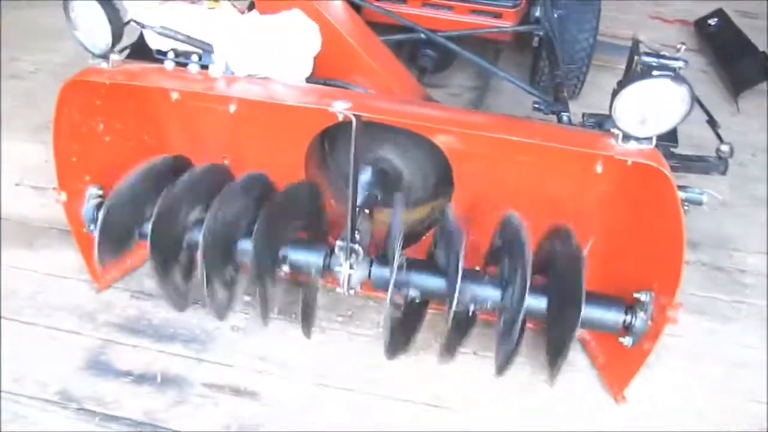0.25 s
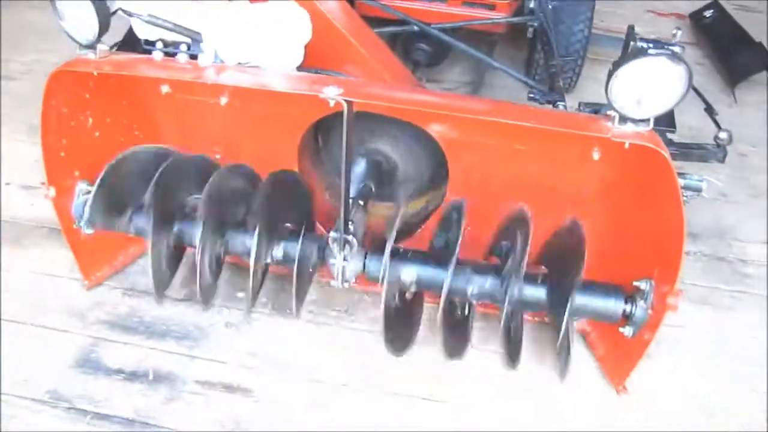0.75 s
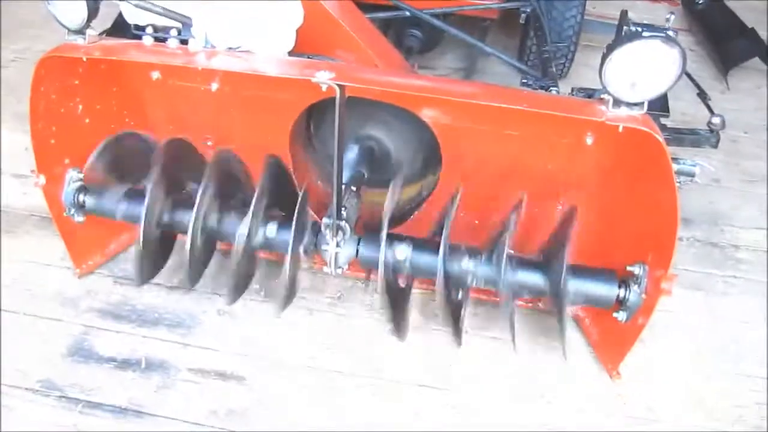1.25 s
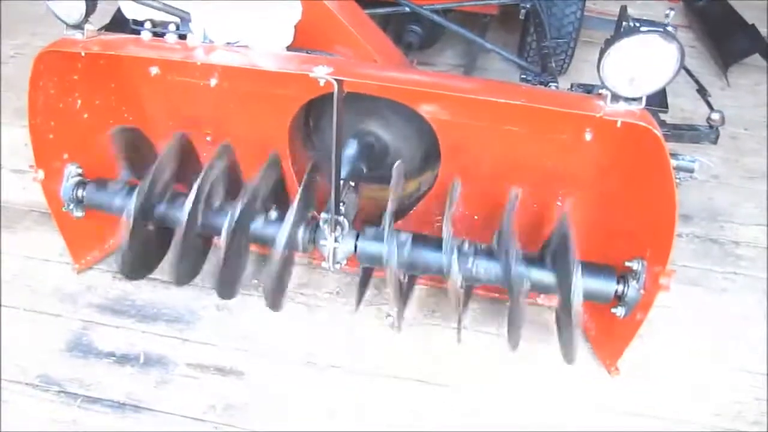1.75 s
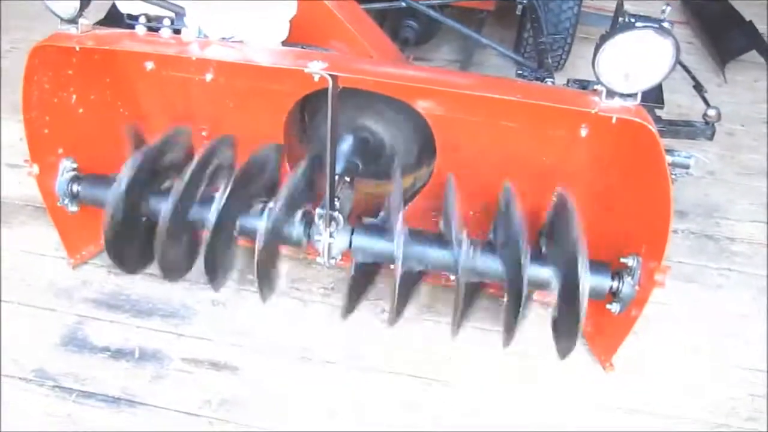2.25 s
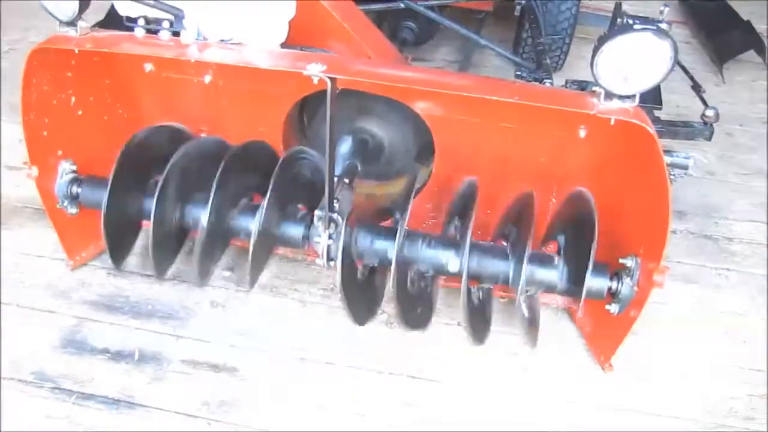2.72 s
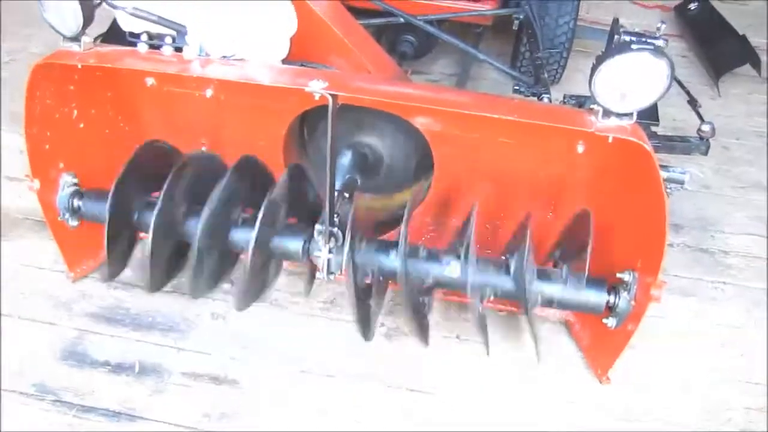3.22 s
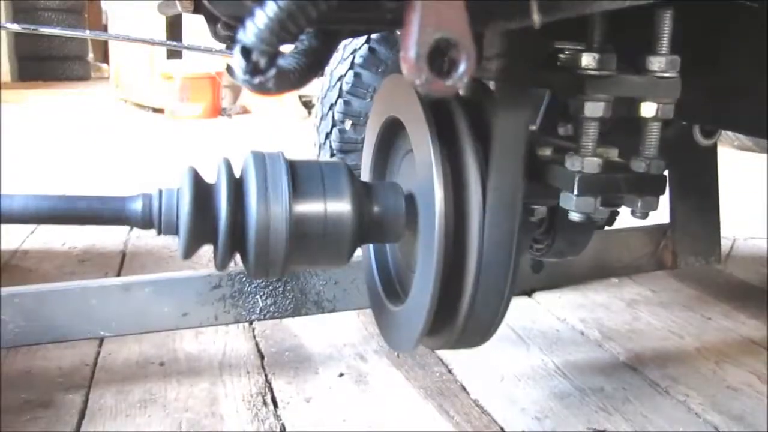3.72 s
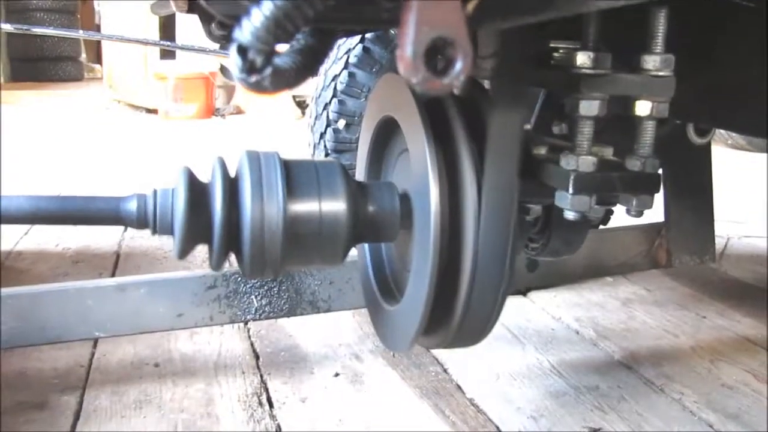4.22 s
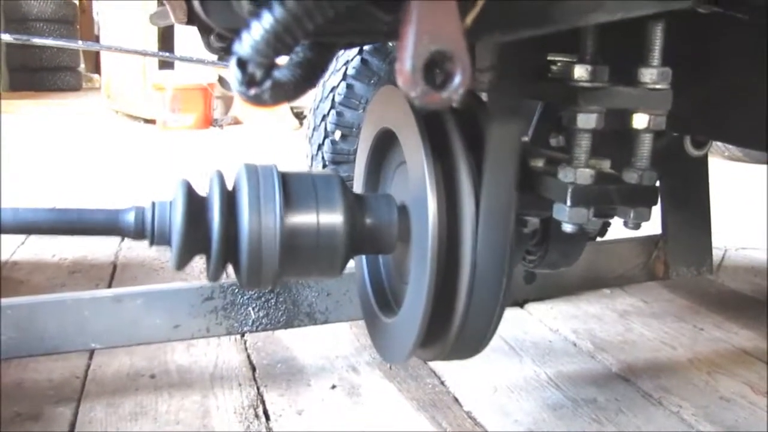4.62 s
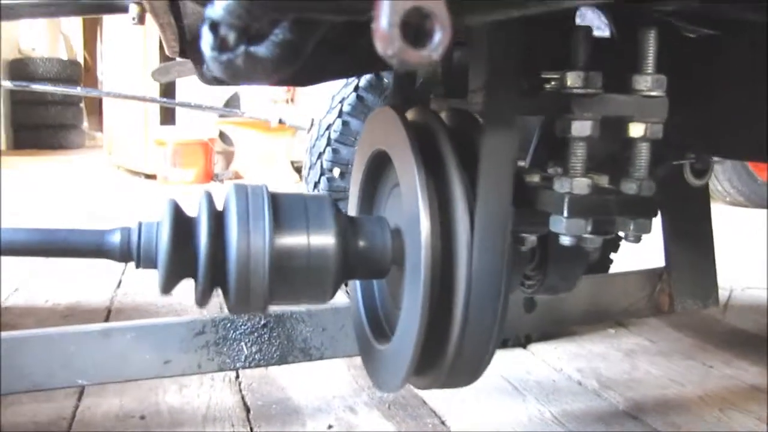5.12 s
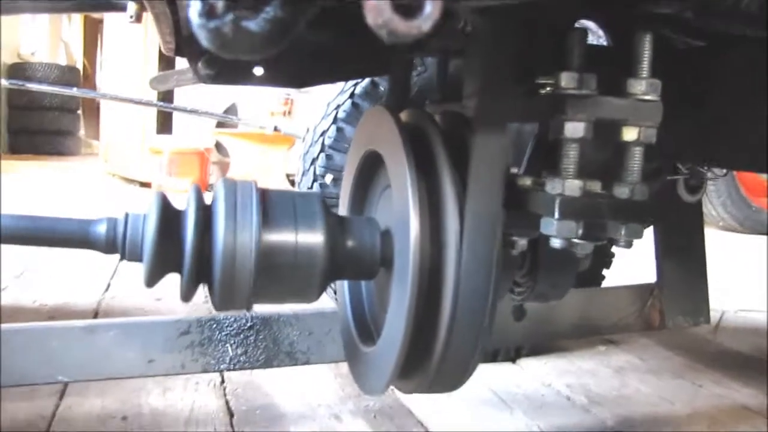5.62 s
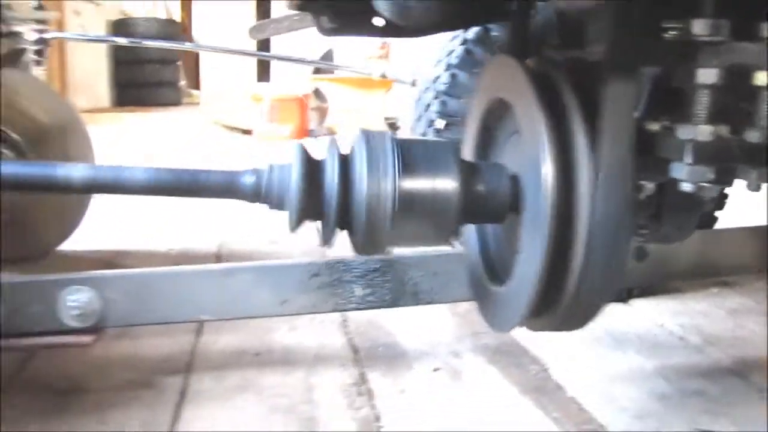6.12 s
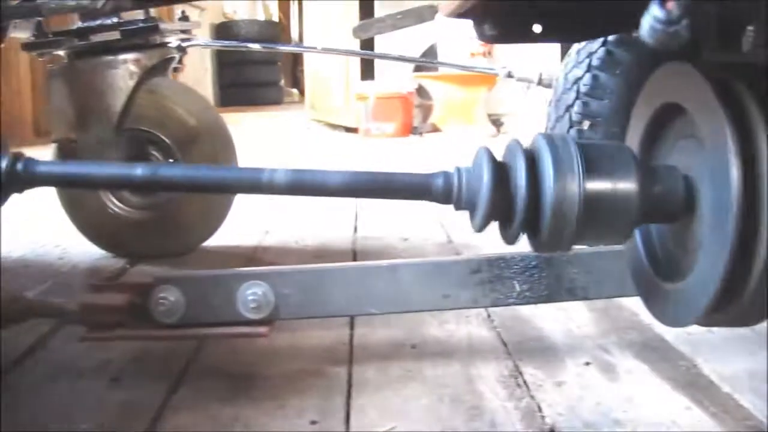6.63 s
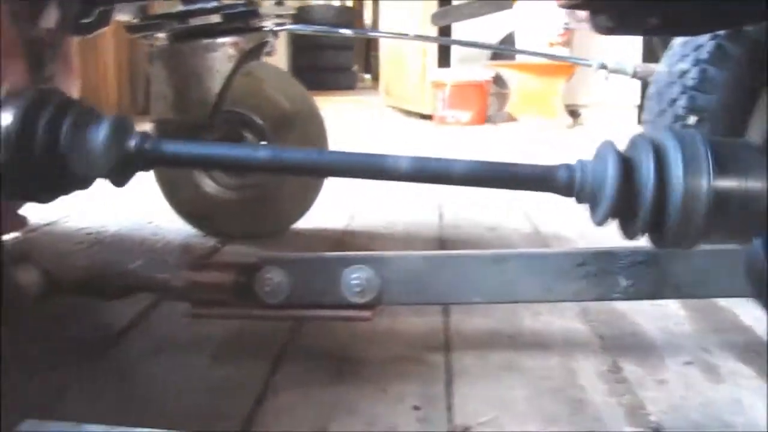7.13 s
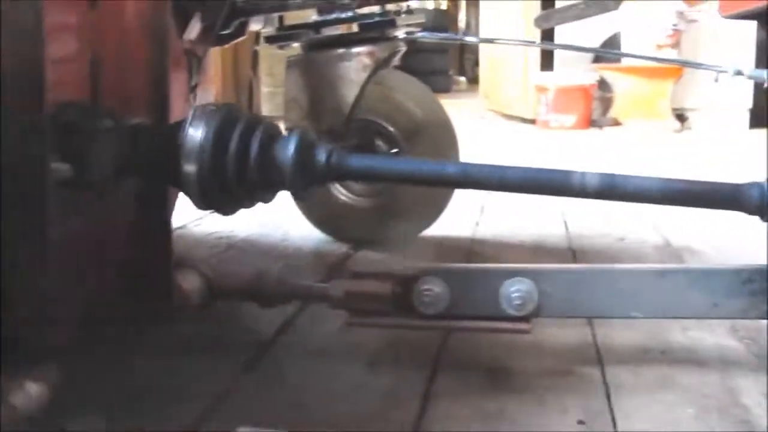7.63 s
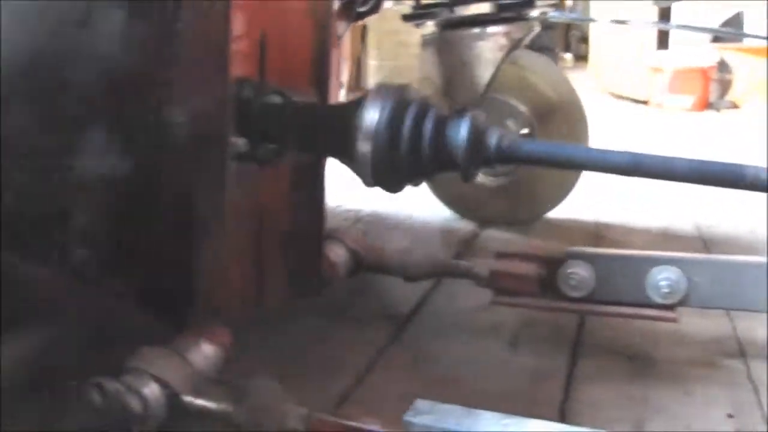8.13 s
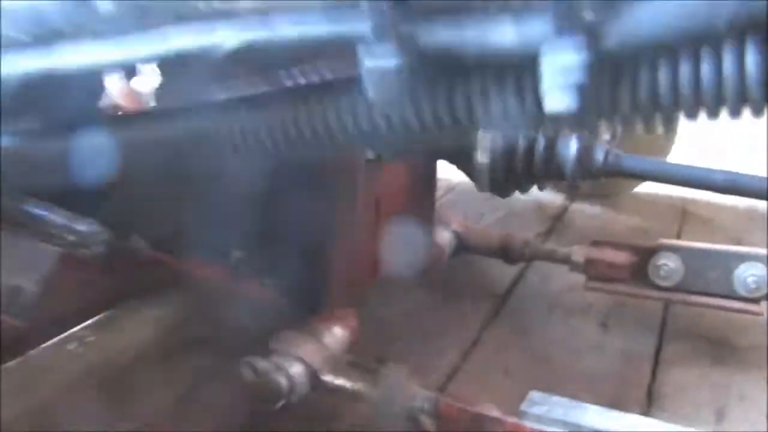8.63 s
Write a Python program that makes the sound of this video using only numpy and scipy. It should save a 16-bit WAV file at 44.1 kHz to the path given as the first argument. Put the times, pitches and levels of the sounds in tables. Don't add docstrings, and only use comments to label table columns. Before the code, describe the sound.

From 0 s a small one-cylinder engine runs steadily, already at full level: a rough low drone around 140 hertz with a slower-beating impeller hum, a wide airy roar, loose steel buzz, rapid valve ticking and hiss. In front of the microphone an empty auger turns nearly four times a second, each turn giving hard metallic knocks and bright gritty scrapes, slightly irregular. Everything fades steadily until about 3.15 s, then there is a silence of under 0.2 s. From 3.3 s the machine fades in slowly, close to the pulley, with no auger clatter: a smoother drone, less roar, faint pump whine near two kilohertz. From about 6.2 s the position moves along the shaft; rattle and roar grow, the whine stands out strongly around 7.4 to 7.9 s, then drops abruptly near 8 s. The drone continues, loudest at the end, near 8.9 s, without stopping.

```python
import sys
import numpy as np
from scipy import signal
from scipy.fft import rfft, irfft, next_fast_len
from scipy.io import wavfile
from scipy.ndimage import map_coordinates

SR = 44100
rng = np.random.default_rng(int(sys.argv[2]) if len(sys.argv) > 2 else 0)


def field_ratio(decibels):
    return 10 ** (np.asarray(decibels, dtype=float) / 20)


def dump(signal):
    limited = np.clip(np.atleast_2d(signal).T, -1, 1)
    pcm = np.round(limited * 32767).astype(np.int16)
    wavfile.write(sys.argv[1], SR, pcm)


N = 390726
GAP_START_S, GAP_END_S = 3.152, 3.3185
BELT_RATIO = .8188
AUGER_TURN_S = .2629
TICK_SAMPLES = 500
THIN = 8

# [t/s, place: 0 front, 1 pulley, 2 behind the housing]
PATH = [
    (0, 0),
    (3.2, 0),
    (3.3, 1),
    (6.2, 1),
    (7.2, 1.95),
    (8.86, 2.177),
]
# [t/s, f/Hz]
CRANK_SPEED = [(0.2, 46.48), (0.6, 46.43), (1.2, 46.55), (2.2, 46.45), (3.0, 46.62), (3.45, 46.61),
               (4.35, 46.68), (4.95, 46.42), (5.3, 46.56), (5.7, 46.9), (6.45, 46.48), (6.8, 46.42),
               (7.35, 46.8), (7.7, 46.96), (8.0, 46.88), (8.55, 46.31)]
# [multiple of crank turns, level/dB front, level/dB pulley, level/dB behind]
EXHAUST_ORDERS = [(1, -21, -19, -21), (2, -17, -16, -17), (3, 0, 0, 0), (4, -7, -8, -7), (5, -16, -13, -11),
                  (6, -14, -16, -9), (7, -25, -18, -20), (8, -19, -13, -17), (9, -19, -18, -20),
                  (10, -23, -18, -23), (11, -22, -26, -24), (12, -26, -28, -29)]
# [f/Hz, width f/Hz, level/dB]
SILENCER_MODES = [(135, 60, 0), (300, 90, -8), (480, 140, 0)]
# [f/Hz, density level/dB per Hz]
RUMBLE_SPECTRUM = [(25, -24), (42, -10), (60, -9), (100, -5), (160, -1.5), (215, -5.5), (320, -7.5),
                   (450, -16.5), (600, -40.5)]
# [multiple of shaft turns, level/dB front, level/dB pulley, level/dB behind]
SHAFT_ORDERS = [(1, -12, -17, -19), (2, -18, -17, -17), (3, 0, 0, 0), (5, -5, -16, -16), (6, -1, -15, -14),
                (9, -8, -14, -19), (12, -21, -24, -26), (15, -16, -32, -30)]
# [multiple of crank turns, level/dB front, level/dB pulley, level/dB behind, share of the swell]
PUMP_ORDERS = [(20, -21, -24.5, -14, .2), (38, -29, -16.5, -22, .5), (40, -30, -23, -30, .4),
               (42, -13.5, -12.5, -12.5, 1), (46, -22, -18.5, -24, 1)]
# [t/s, level/dB]
PUMP_SWELL = [
    (3.2, -1),
    (4.35, 2.5),
    (4.95, -3),
    (5.5, -2.5),
    (5.9, 1),
    (6.7, -5.5),
    (7.4, 9.5),
    (7.92, 5.5),
    (8.08, -9.5),
]
# [f/Hz, density level/dB per Hz]
ROAR_SPECTRA = [
    [(180, -26), (300, -6.5), (459, -7.5), (607, -3), (833, -9.5), (912, -8.5), (998, -9), (1980, -6),
     (2270, -8), (2600, -18.5), (3380, -41), (5720, -120)],
    [(180, -42), (300, -7.5), (356, -5), (467, -9.5), (511, -8.5), (727, -8), (937, -11), (1210, -9.5),
     (1910, -11.5), (2600, -25.5), (3380, -43), (5720, -120)],
    [(180, -33), (300, -8.5), (322, -7), (404, -15), (591, -4.5), (768, -10.5), (928, -9), (1160, -10),
     (1960, -9.5), (2600, -25.5), (3380, -51), (5720, -120)],
]
# [f/Hz, density level/dB per Hz]
RATTLE_SPECTRA = [
    [(1350, -37), (2300, -6), (2540, 1.5), (3190, -0.5), (5200, -10), (6760, -38.5), (11400, -120)],
    [(1350, -23), (2300, 1), (3650, -1), (4300, -2), (5200, -11), (6760, -34), (11400, -120)],
    [(1350, -42), (2300, 0), (2570, 3), (2770, -1), (3350, -0.5), (4760, -6), (5200, -6), (6760, -12),
     (11400, -120)],
]
# [f/Hz, density level/dB per Hz]
HISS_SPECTRA = [
    [(2820, -37), (4800, -5.5), (5270, -6), (6140, -1.5), (7970, -5.5), (8670, -8), (9520, -9.5),
     (12500, -16.5), (14400, -28), (15600, -31)],
    [(2820, -27), (4800, -0.5), (5320, -5), (5790, 1.5), (6020, 0.5), (8170, -6), (10500, -5.5),
     (11600, -11.5), (13300, -14), (14500, -24), (15600, -34)],
    [(2820, -31), (4800, 0.5), (5320, -10.5), (6170, -0.5), (9470, -4.5), (10500, -6.5), (14500, -20.5),
     (15600, -47)],
]
# [f/Hz, width f/Hz, level/dB]
BRACKET_MODES = [(985, 30, -3), (1297, 50, -1), (1600, 50, -5), (1860, 30, 1), (2025, 70, -1),
                 (2630, 60, -5)]
# [f/Hz, level/dB front, level/dB beside the engine]
VALVE_MODES = [(3090, -7, -3.5), (4310, -9, -3.5), (5890, 0, 0), (6340, -5, -3.5), (6800, 3.5, -11),
               (7110, -6, -3.5), (7800, -2, -9), (8700, -9.5, -5.5), (9580, -1.5, -8), (10400, -13, -6),
               (11210, -10, -9), (12200, -14, -9)]
# [first t/s, knock level/dB, scrape level/dB over the exhaust, scatter level/dB]
AUGER_CONTACTS = [
    (.0705, 2, -4, 2),
    (.1225, 9.5, -14, .5),
    (.16, -8, -9, 3),
    (.2435, -2, 1.5, 1),
    (2.9614, 4, 3, 0),
]
# [f/Hz, width f/Hz, level/dB]
HOUSING_MODES = [(2700, 720, 2), (3260, 1120, -2.5), (4330, 1400, -7), (1500, 620, 2)]
# [f/Hz, width f/Hz, level/dB]
BLADE_MODES = [(5975, 960, 4), (6540, 550, -5.5), (7370, 800, -3)]
# [place, roar level/dB, rattle level/dB, hiss level/dB, impeller level/dB]
LAYER_LEVELS = [(0, -4.5, -9.3, -14.5, -8.5), (1, -10.3, -15.2, -17.3, -4.5),
                (1.3, -13.5, -18, -19.3, -4.5), (1.95, -11.5, -17, -18.7, -3.5),
                (2.02, -9.2, -12.4, -19.5, -3)]
# [f/Hz, correlation]
CORRELATION = [(25, 1), (100, 0.92), (300, .9), (700, 0.86), (1400, 0.86), (3000, .35), (7000, 0.41),
               (15000, .15)]
# [f/Hz, level/dB]
BALANCE = [(60, 3), (150, 5), (380, 0), (950, 3.5), (2380, 0), (5980, 2), (15000, -1)]
# [left lag in samples, left-right level/dB]
PORT_SKEW = [(-.3, -1.2), (1.5, 0.6), (3, -0.8)]
# [silent at t/s, length t/s, full level/dB, curve power]
FADE_OUT_CURVE = (3.28, 3.28, -42.7, .85)
FADE_IN_CURVE = (3.32, 3.3, -33, .87)


def unit(x):
    return x / np.sqrt(np.mean(x ** 2) + 1e-20)


def along(points, hz):
    f, value = np.transpose(points)
    return np.interp(np.log(hz + 1), np.log(f + 1), value)


def over_time(points):
    return np.interp(np.arange(N) / SR, *np.transpose(points))


def place():
    return over_time(PATH)


def by_place(layers):
    at = place()
    return sum(np.sqrt(np.clip(1 - abs(at - k), 0, 1)) * x for k, x in enumerate(layers))


def layer_levels_db():
    at, *layers = np.transpose(LAYER_LEVELS)
    return [np.interp(place(), at, db) for db in layers]


def wobble(rate_hz, size=1):
    step = np.arange(0, N + 64, 32)
    knots = rng.standard_normal(int(N * rate_hz / SR) + 4)
    curve = map_coordinates(knots, [step * rate_hz / SR])
    return np.interp(np.arange(0, N, size), step, curve)


def turns(hz):
    return 2 * np.pi * np.cumsum(hz) / SR


def filtered(x, response):
    m = next_fast_len(N + 8192)
    return irfft(rfft(x, m) * response(np.fft.rfftfreq(m, 1 / SR)), m)[..., :N]


def modes(table):
    return lambda f: sum(field_ratio(db) * 1j * f * w / (c * c - f * f + 1j * f * w) for c, w, db in table)


def rush(spectra, gate):
    m = next_fast_len(N + 8192)
    hz = np.fft.rfftfreq(m, 1 / SR)
    angle = np.arccos(np.clip(along(CORRELATION, hz), -1, 1)) / 2
    same, other = rfft(gate * rng.standard_normal((2, N)), m) * [np.cos(angle), np.sin(angle)]
    lean = field_ratio(along(BALANCE, hz) / 2)
    left, right = (same + other) * lean, (same - other) / lean
    heard = []
    for spectrum, (lag, db) in zip(spectra, PORT_SKEW):
        colour = field_ratio(along(spectrum, hz))
        skew = field_ratio(db / 2) * np.exp(-1j * np.pi * hz * lag / SR)
        ports = np.array([left * colour * skew, right * colour / skew])
        heard.append(unit(irfft(ports, m)[:, :N]))
    return by_place(heard)


def stack(angle, orders, flutter_db):
    mean_hz = angle[-1] / (2 * np.pi) * SR / N
    coarse, at = angle[::THIN], place()[::THIN]
    tones = 0
    for k, *db in orders:
        level_db = np.interp(at, np.arange(len(db)), db) + flutter_db * wobble(7, size=THIN)
        lag = np.angle(modes(SILENCER_MODES)(k * mean_hz)) - 1
        sway = .025 * k * wobble(9, size=THIN)
        tones = tones + np.sqrt(2) * field_ratio(level_db) * np.cos(k * coarse + lag + sway)
    return signal.resample_poly(tones, THIN, 1)[:N]


def exhaust(crank):
    rumble = field_ratio(-12.5) * rush([RUMBLE_SPECTRUM] * 3, field_ratio(1.5 * wobble(13)))
    return field_ratio(-1.54) * stack(crank, EXHAUST_ORDERS, flutter_db=0.5) + rumble


def impeller(shaft):
    impeller_db = layer_levels_db()[-1]
    return field_ratio(impeller_db - 1.4) * stack(shaft, SHAFT_ORDERS, flutter_db=0.67)


def pump(crank):
    swell_db = over_time(PUMP_SWELL)
    at = place()
    skew = np.array([[.5], [-.5]])
    whine = 0
    for k, *db, share in PUMP_ORDERS:
        level_db = np.interp(at, [0, 1, 2], db) + share * swell_db + 0.44 * wobble(25)
        line = field_ratio(-2.5 * skew) * np.cos(k * crank + .03 * k * skew + 0.27 * wobble(20))
        whine = whine + field_ratio(level_db) * line
    return whine


def closing(crank, second_db):
    def seat(late):
        return np.exp(-np.mod(crank - late, 2 * np.pi) / .5) * field_ratio(5.3 * wobble(65))
    return seat(0) + field_ratio(second_db) * seat(2.5)


def valves(crank):
    hz, front_db, side_db = np.transpose(VALVE_MODES)
    t, out = np.arange(TICK_SAMPLES) / SR, np.zeros((2, N + TICK_SAMPLES))
    shape = field_ratio(-60 * t / 0.021) * (1 - np.exp(-t / .0012))
    drift = np.array([wobble(1.43) for _ in hz])
    # lag in radians, level/dB in front, level/dB beside the engine
    for late, front_cut_db, side_cut_db in [(0, 0.5, 0), (2.3, -10, -3.5)]:
        for i in np.flatnonzero(np.diff(np.floor((crank - late) / (2 * np.pi)))):
            in_front = i < GAP_START_S * SR
            level_db = front_db + front_cut_db if in_front else side_db + side_cut_db
            size, detune, *phase = rng.standard_normal((4, len(hz), 1))
            ring_hz = hz[:, None] * (1 + .01 * detune)
            ring = np.sin(2 * np.pi * ring_hz * t + 1.86 * np.array(phase))
            gain = field_ratio((level_db + 1.2 * drift[:, i])[:, None] + 4 * size)
            out[:, i:i + TICK_SAMPLES] += (gain * ring).sum(axis=1) * shape
    return unit(out[:, :N])


def works(crank, shaft):
    roar_db, rattle_db, hiss_db = layer_levels_db()[:-1]
    beat = np.cos(crank - 1) + .5 * np.cos(shaft)
    shared = .6 * wobble(10) + 0.87 * wobble(40)
    seats = by_place([closing(crank, second_db=db) for db in (-15, -3, 0)])
    roar = rush(ROAR_SPECTRA, field_ratio(0.6 * beat + 0.92 * shared + 0.41 * np.cos(4 * crank)))
    rattle = rush(RATTLE_SPECTRA, field_ratio(1.2 * beat + 0.44 * shared + 0.86 * wobble(25)) + .15 * seats)
    hiss = rush(HISS_SPECTRA, field_ratio(1.2 * beat + 0.47 * shared + 2.3 * wobble(60)) + 0.85 * seats)
    shaking = rng.standard_normal((2, N)) * field_ratio(2.5 * wobble(5))
    buzz = unit(filtered(shaking, lambda f: modes(BRACKET_MODES)(f) ** 2))
    low = field_ratio(roar_db + 0.61) * (roar + field_ratio(-8.5) * buzz)
    high = field_ratio(0.5) * hiss + field_ratio(-4) * valves(crank)
    return low + field_ratio(rattle_db + 1.2) * rattle + field_ratio(hiss_db) * high


def bursts(events, attack_s, t60_s, body):
    t, out = np.arange(SR // 8) / SR, np.zeros((2, N + SR))
    for s, db in events:
        grit = rng.standard_normal((2, len(t))) + 0.72 * rng.standard_normal(len(t))
        envelope = field_ratio(db - 60 * t / t60_s) * (1 - np.exp(-t / attack_s))
        out[:, round(s * SR):][:, :len(t)] += envelope * grit
    return filtered(out[:, :N], lambda f: modes(body)(f) ** 2)


def auger():
    laps = np.arange(int(GAP_START_S / AUGER_TURN_S) + 1) * AUGER_TURN_S
    luck = rng.standard_normal((len(AUGER_CONTACTS), len(laps), 3))
    knocks, scrapes = [], []
    for (first_s, knock_db, scrape_db, scatter_db), draws in zip(AUGER_CONTACTS, luck):
        for lap_s, z in zip(laps, draws):
            if first_s + lap_s < GAP_START_S:
                s = first_s + lap_s + .003 * z[0]
                knocks.append((s, knock_db + scatter_db * z[1]))
                scrapes.append((s, scrape_db + scatter_db * z[2]))
    knock = bursts(knocks, attack_s=0.0017, t60_s=.11, body=HOUSING_MODES)
    scrape = bursts(scrapes, attack_s=0.0089, t60_s=0.15, body=BLADE_MODES)
    return field_ratio(-4.5) * knock + field_ratio(-0.5) * scrape


def fader():
    rate_hz = 29.97
    step = np.floor((np.arange(N) / SR - GAP_END_S) * rate_hz)
    t = GAP_END_S + (step + .5) / rate_hz

    def ramp(silent_s, length_s, full_db, power):
        return field_ratio(full_db) * np.clip(abs(t - silent_s) / length_s, 0, 1) ** power
    return np.where(t < GAP_END_S, ramp(*FADE_OUT_CURVE), ramp(*FADE_IN_CURVE))


def scene():
    t = np.arange(N) / SR
    crank = turns(over_time(CRANK_SPEED))
    shaft = BELT_RATIO * crank
    low = (exhaust(crank) + impeller(shaft)) * field_ratio([[.8], [-.8]])
    machine = low + pump(crank) + works(crank, shaft)
    rounded = machine / (1 + abs(machine / 4.4) ** 5) ** (1 / 5)
    sounding = (t < GAP_START_S) | (t > GAP_END_S)
    return fader() * (rounded + auger()) * sounding


def top_cut(x):
    return signal.sosfilt(signal.butter(12, 15720, fs=SR, output="sos"), x)


def record(dry):
    mix = filtered(dry, lambda hz: hz < 15700)
    return top_cut(mix)


dry = scene()
out = record(dry)
dump(out)
```